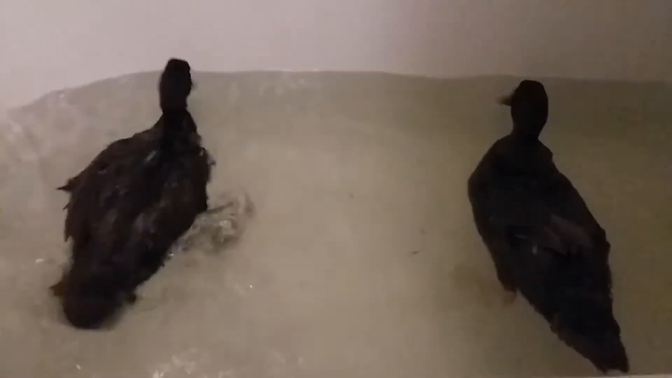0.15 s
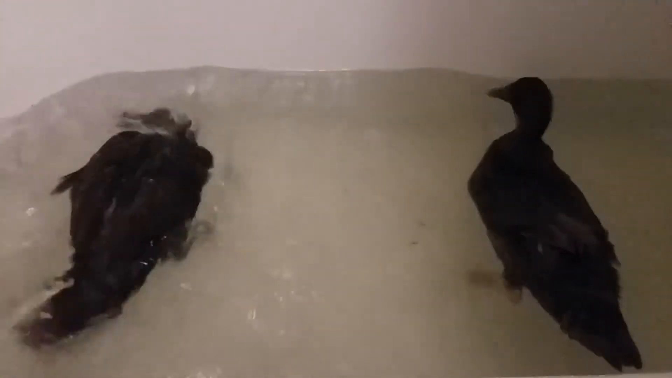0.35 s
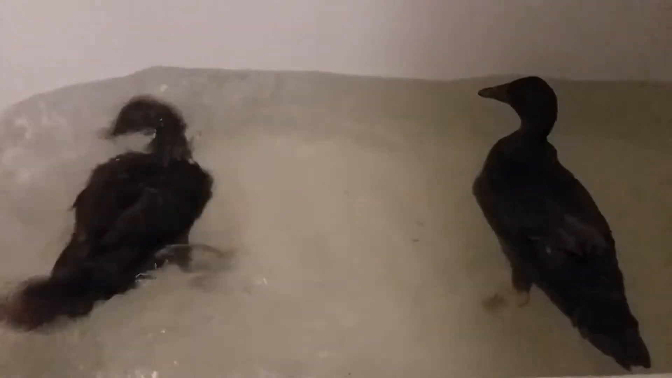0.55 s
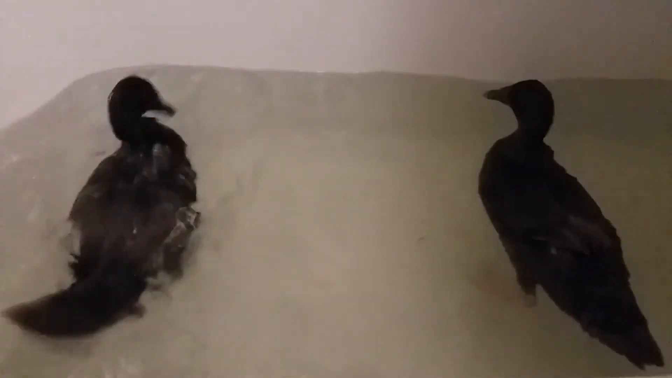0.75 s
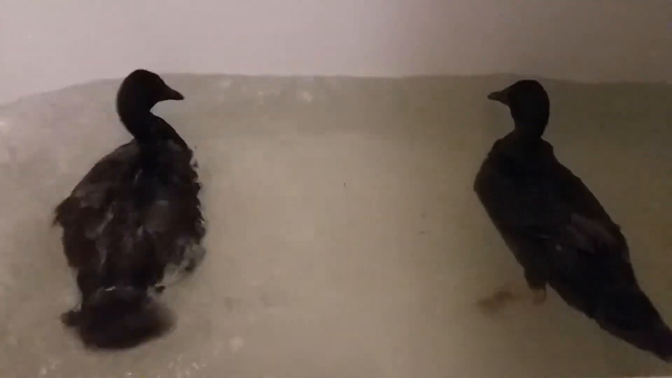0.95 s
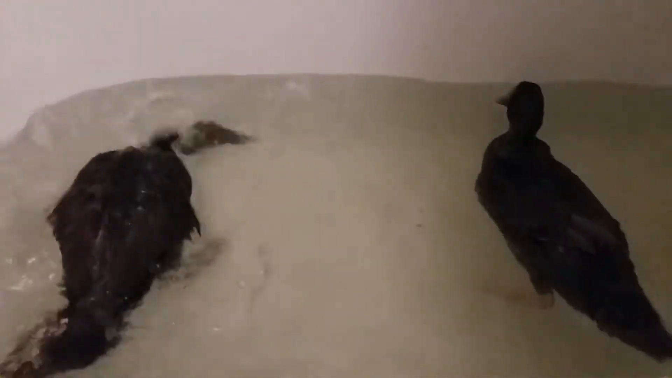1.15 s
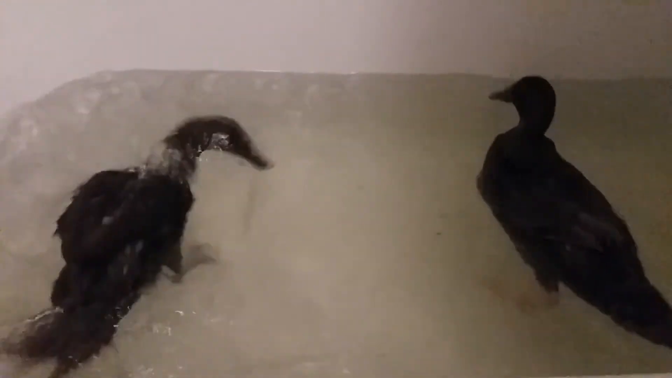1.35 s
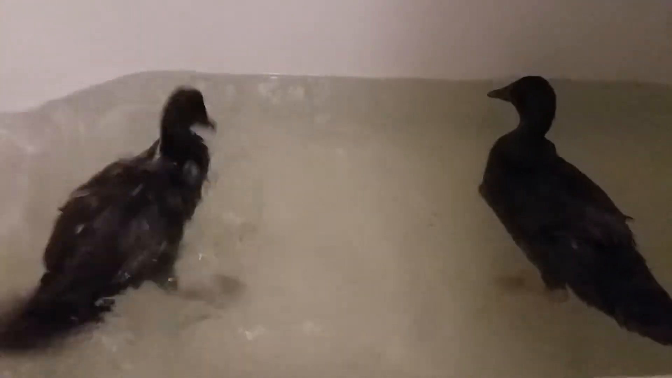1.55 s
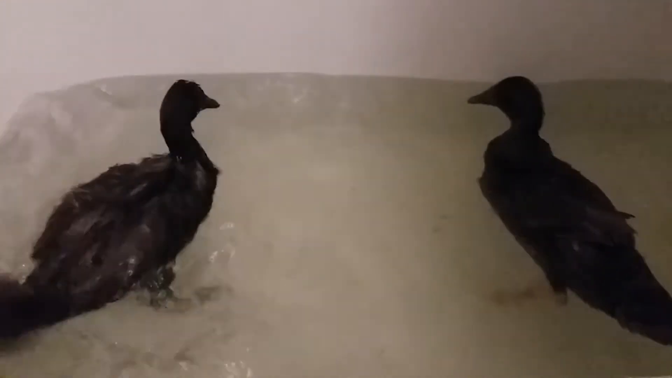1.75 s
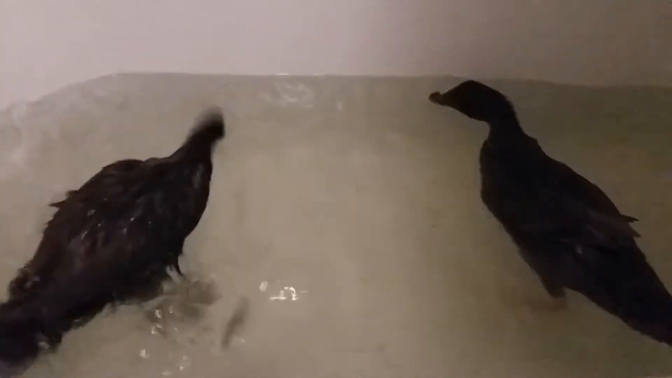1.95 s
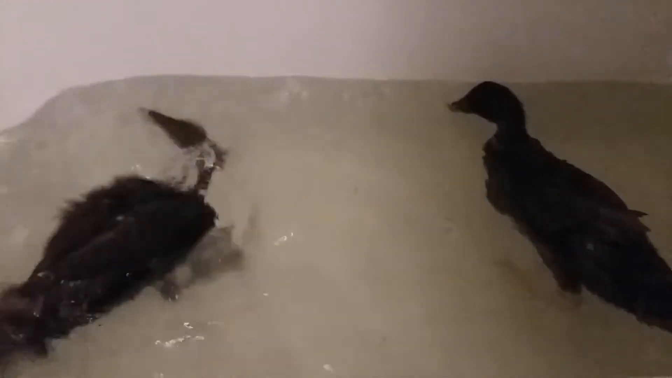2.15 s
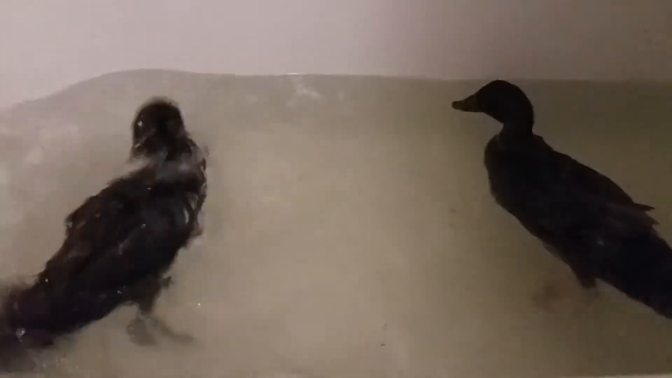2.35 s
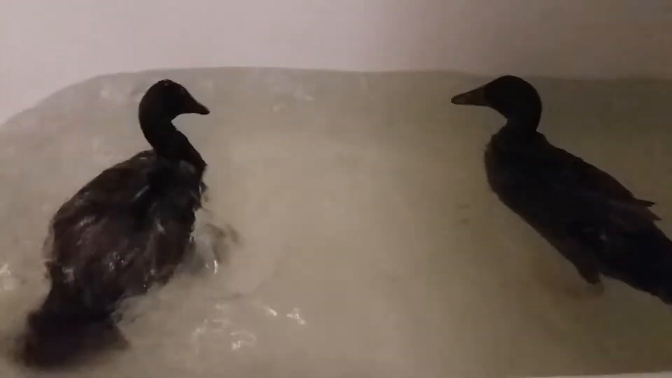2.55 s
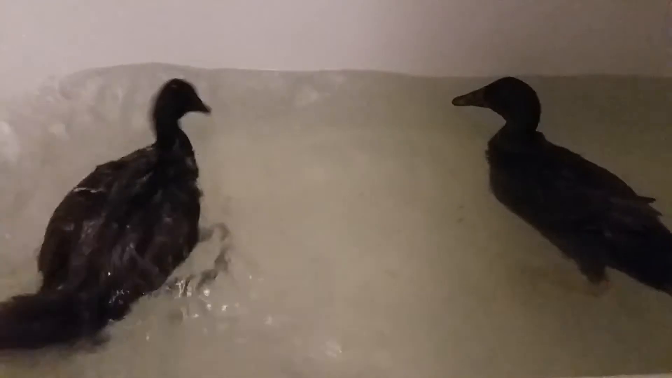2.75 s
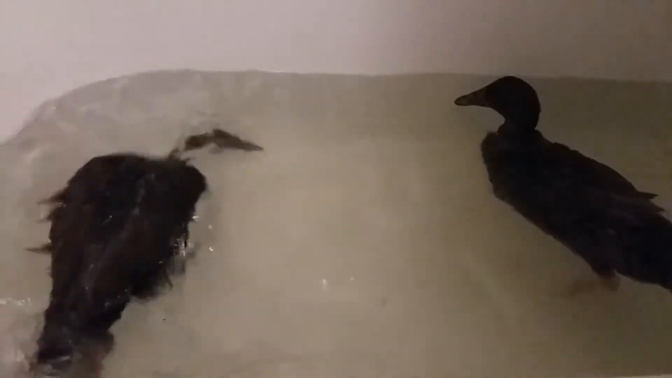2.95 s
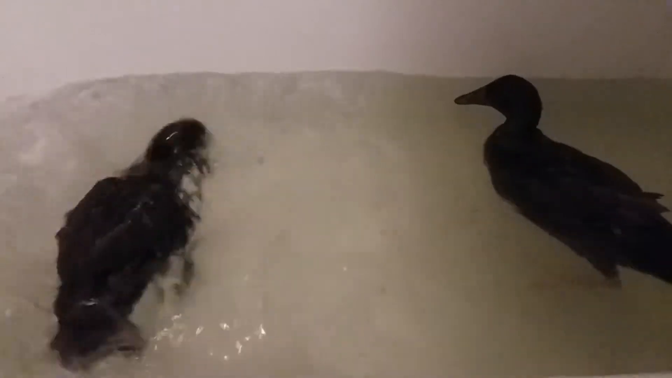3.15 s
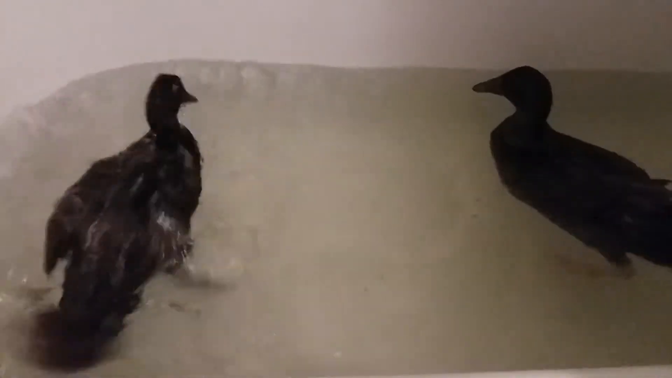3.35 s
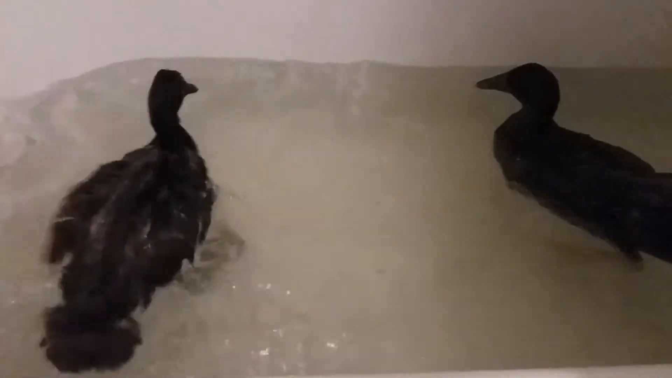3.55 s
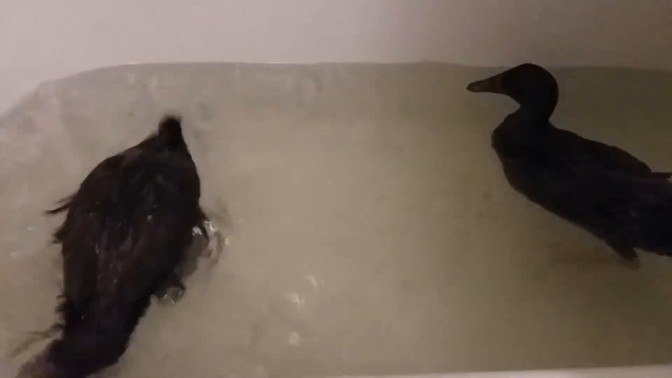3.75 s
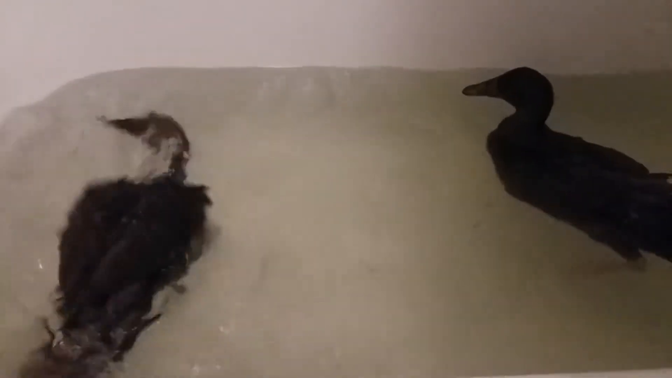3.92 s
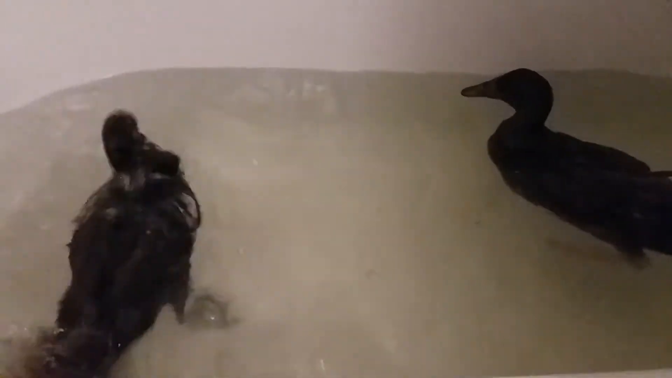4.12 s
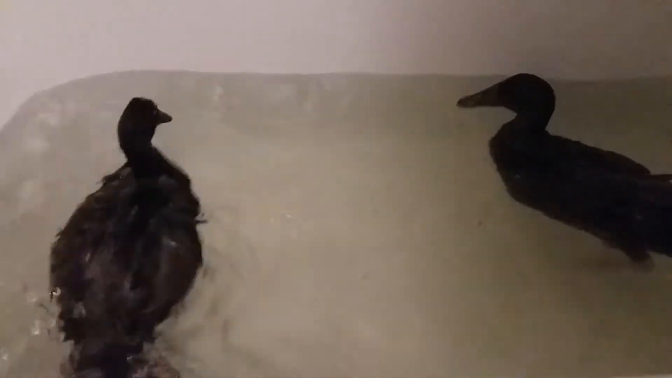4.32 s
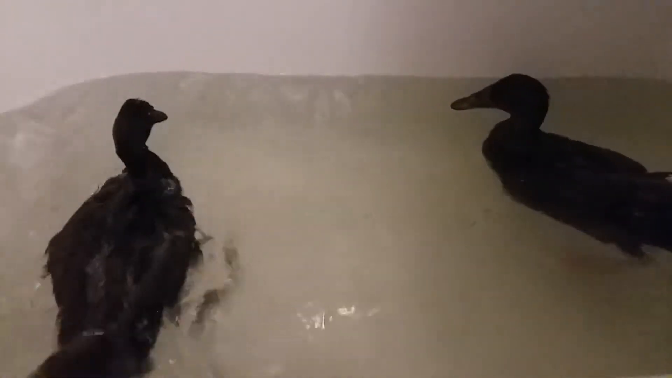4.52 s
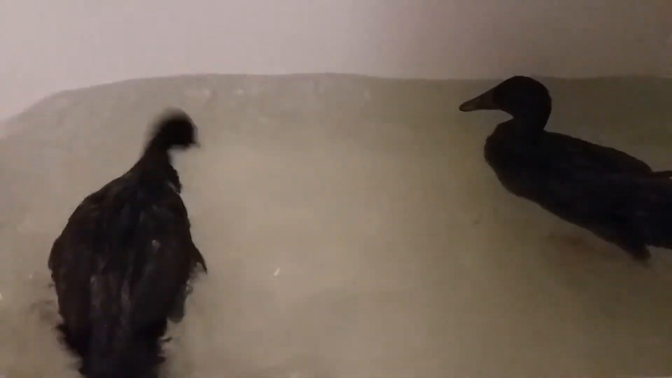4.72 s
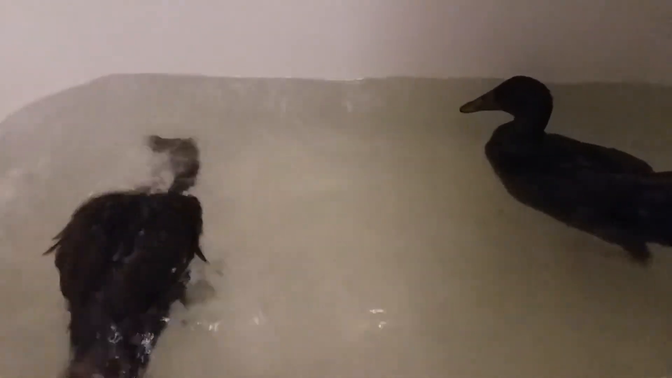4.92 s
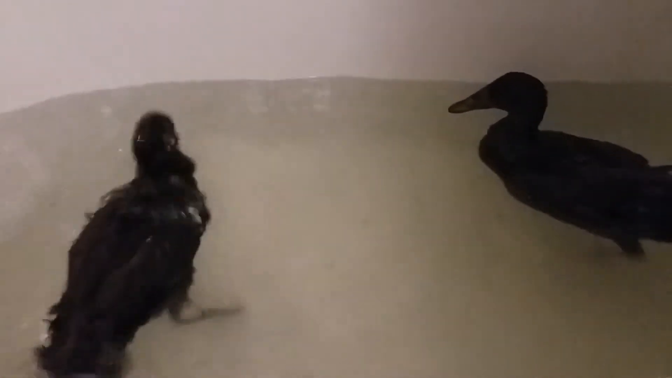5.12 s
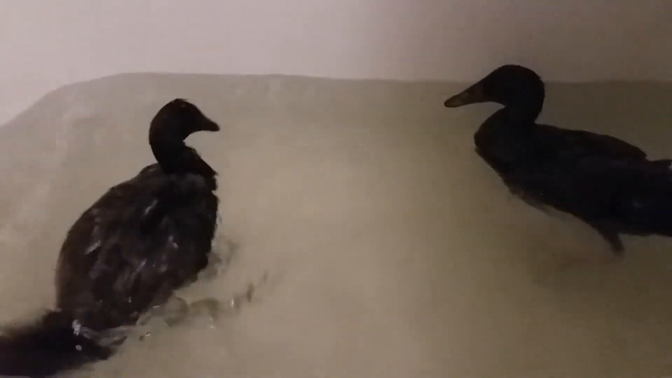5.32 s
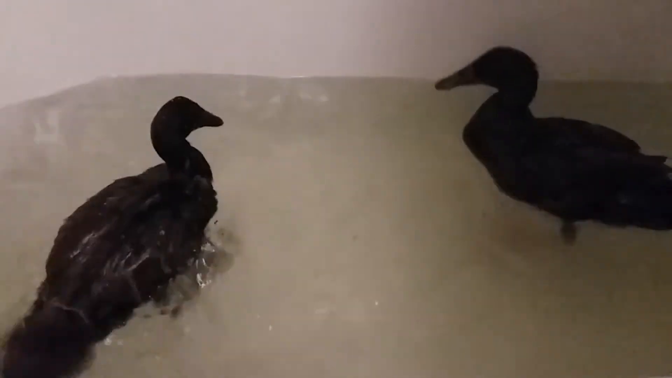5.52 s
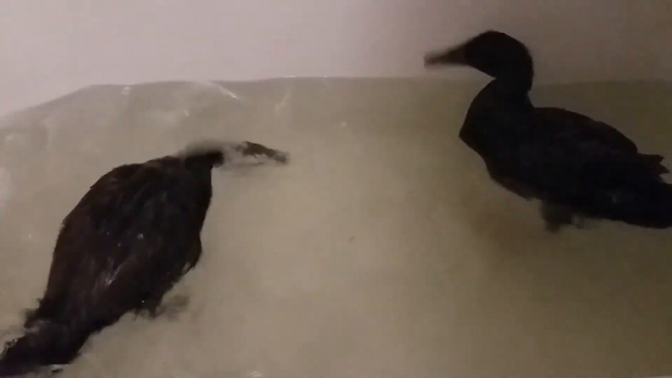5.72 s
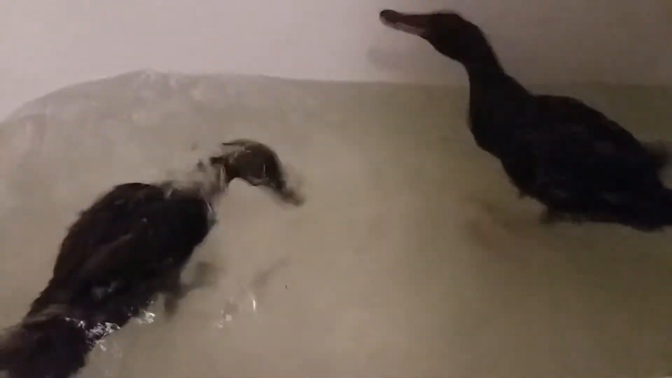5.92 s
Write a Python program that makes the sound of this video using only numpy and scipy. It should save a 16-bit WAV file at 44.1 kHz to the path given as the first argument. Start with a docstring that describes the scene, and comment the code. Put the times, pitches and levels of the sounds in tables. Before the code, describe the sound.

Two ducks in a half-filled bathtub indoors, heard closely over steady faint rumble and hiss. Light drips open, then from 0.3 to 0.75 seconds slaps, gurgling bubbles and sharp drops tumble together. A smaller splash comes near 0.95, a strong one at 1.27, and a hand thumps the right microphone at 1.44. Looser bubbling and drips continue until a bright, spattering burst around 2.1 to 2.5, full of rising chirps. It thins to drips, then slaps return at 3.0 and strongly at 3.2 to 3.3, with weak bumps on the right. Lower, gurgling splashes fill 3.75 to 4.4; another plop lands at 4.9 and bubbles trail off. Around 5.3 to 5.5 it is nearly calm, a crisp drop clicks at 5.53, small plops follow, and a fresh splash at 6.0 is cut off. Reflections are short and hard; left bright, right muffled.

```python
"""Over a faint rumble and hiss, a drop smacks, then chirps, slaps and spray: two ducks in a half-filled bathtub.
Bubbles are rising sines, drops and slaps are filtered noise clicks, and splashes swell and fade as
swarms of random bubbles and patters of droplet clicks. The hard tub smears the water into a short dense ring.
The left microphone is bright, the right one muffled; a hand knocks the right one at times."""
import sys
import numpy as np
from scipy import signal
from scipy.fft import rfft, irfft
from scipy.io import wavfile

SR = 44100
rng = np.random.default_rng(int(sys.argv[2]) if len(sys.argv) > 2 else 0)


def store_wav(level_fs):
    """Save 16-bit WAV to argv[1]."""
    pcm = np.round(np.clip(np.atleast_2d(level_fs), -1, 1) * 32767)
    wavfile.write(sys.argv[1], SR, pcm.T.astype(np.int16))


N = 268125  # length in samples
SPOTS = 4  # places in the tub, each with echoes of its own


def from_db(db):
    """dB to gain."""
    return 10 ** (np.asarray(db) / 20)


def rms_one(x):
    """Scale to rms 1."""
    return x / np.sqrt(np.mean(x ** 2) + 1e-20)


def at_hz(points, hz):
    """Read a table on a log-frequency axis."""
    table_hz, values = np.array(points).T
    return np.interp(np.log(hz), np.log(table_hz), values)


def coloured(x, spectrum):
    """Weight a signal by a spectrum in dB."""
    length = x.shape[-1]
    hz = np.fft.rfftfreq(length, 1 / SR) + 1  # keeps the logarithm finite
    return irfft(rfft(x) * from_db(at_hz(spectrum, hz)), length)


def filtered(x, order, edges, kind):
    """Butterworth filter; edges in Hz."""
    return signal.sosfilt(signal.butter(order, edges, kind, fs=SR, output="sos"), x)


def add(track, s, sound):
    """Mix a sound in at a time in seconds."""
    i = int(round(s * SR))
    track[i:i + len(sound)] += sound[:N - i]


# Spectrum shape of the house rumble and hiss. Each row: frequency in Hz, relative density in dB per Hz.
HUSH_SPECTRUM = [(12, -9), (20, -16.5), (104, 10), (268, 3.5), (385, -21.5), (730, -11), (1210, -19),
                 (1900, -17), (2790, -14), (4600, -11), (7820, -11), (8740, -12), (15700, -12)]


def hush(level_db):
    """House rumble and hiss: steady coloured noise, mostly shared by both sides, partly each side's own."""
    shared, *own = coloured(rng.standard_normal((3, N)), HUSH_SPECTRUM)
    return from_db(level_db) * rms_one(2.16 * shared + np.array(own))


# The hand at the right microphone. Each row: start in seconds, push level in dB, sign,
# push width in seconds, case ring in Hz.
HAND_KNOCKS = [(1.436, -11, -1, .00021, 210), (3.310, -25, 1, .0003, 150), (3.346, -28, 1, .0004, 200),
               (3.548, -23, -1, .0003, 260), (3.654, -41, -1, .0015, 120), (3.868, -37, -1, .0015, 90),
               (3.908, -42, 1, .002, 90), (3.930, -43, 1, .002, 90)]


def knocks(ring_db, cycles):
    """A short pressure push, then the case swings back and rings, losing 60 dB in the given cycles."""
    out, t = np.zeros(N), np.arange(-400, 4000) / SR
    for s, peak_db, sign, width, hz in HAND_KNOCKS:
        push = np.exp(-.5 * (t / width) ** 2)
        after = np.maximum(t - width, 0)
        swing = -from_db(ring_db - 60 * after * hz / cycles) * np.sin(2 * np.pi * hz * after)
        add(out, s + t[0], sign * from_db(peak_db) * (push + swing))
    return filtered(out, 1, 35, "high")


# Tone of the droplet spray. Each row: frequency in Hz, weight in dB per Hz.
SPRAY_SPECTRUM = [(1470, -2), (2500, -1.5), (2870, -4), (3530, -3.5), (4770, -9), (8490, -2.5),
                  (10400, -2.5), (13300, 6.5), (15700, 16.5)]


def spray(level_db, per_s, spread_db):
    """Fine droplets: clicks of uneven strength, each place with a pitch range of its own."""
    strength = from_db(spread_db * np.minimum(rng.exponential(1, (SPOTS, N)), 4))
    lands = rng.random((SPOTS, N)) < per_s / SR
    clicks = strength * rng.choice([-1, 1], (SPOTS, N)) * lands
    for k, hz in enumerate(np.geomspace(3500, 11000, SPOTS)):
        clicks[k] = filtered(clicks[k], 1, [hz * 0.6, hz * 0.84], "band") / np.sqrt(hz)
    return from_db(level_db) * rms_one(coloured(clicks, SPRAY_SPECTRUM))


def bubble(hz, octaves, life, fade_db=5.0):
    """A sine whose pitch climbs as the bubble nears the surface; it fades, then bursts."""
    t = np.arange(int(np.clip(life, .002, .12) * SR)) / SR
    pitch = np.minimum(hz * 2 ** (octaves * t / life), 12000)
    phase = np.cumsum(2 * np.pi * pitch / SR)
    burst = np.minimum(1, (life - t) / (0.15 * life))  # quick drop over the last of its life
    return np.sin(phase) * from_db(-fade_db * t / life) * burst


def swarm(level_db, per_s, low_hz, high_hz, cycles, spread_db):
    """Bubbles born at random, of random size, strength and glide; smaller ones ring higher and shorter."""
    out, draws = np.zeros((SPOTS, N)), rng.random((6000, 4))
    born = np.cumsum(-np.log(1 - draws[:, 0]) / per_s)  # random gaps around the mean rate
    for k, (s, (_, size, force, rise)) in enumerate(zip(born[born < N / SR], draws)):
        hz = low_hz * (high_hz / low_hz) ** size
        add(out[k % SPOTS], s, from_db(spread_db * force) * bubble(hz, 0.913 * rise, cycles / hz))
    return from_db(level_db) * rms_one(out) / SPOTS


# Splashes that churn the water. Each row: peak in seconds, swell in seconds, spray fade in seconds,
# then the drive of gurgle, small bubbles and spray in dB.
WATER_SPLASHES = [(0.08, 0.3, 0.14, -73.5, -86, -70.5), (0.28, 0.025, 0.11, -75, -61, -62),
                  (0.33, 0.011, .2, -50, -44, -66), (0.446, .01, 0.22, -38.5, -44.5, -57),
                  (0.485, 0.041, 0.12, -47, -38, -50), (0.68, 0.084, .1, -45, -36.5, -50),
                  (0.745, 0.045, 0.2, -54, -46, -52), (0.98, 0.12, 0.082, -73, -45.5, -59.5),
                  (1.151, 0.18, 0.33, -62, -77, -58.5), (1.27, 0.031, 0.093, -43.5, -37, -43.5),
                  (1.49, .15, 0.13, -41.5, -56, -55), (1.59, 0.45, 0.13, -65, -42.5, -49.5),
                  (1.75, 0.51, 0.27, -70, -67, -60), (1.918, 0.031, 0.16, -60, -45.5, -64),
                  (2.08, 0.023, 0.17, -74, -55, -57), (2.168, 0.17, 0.049, -47.5, -39.5, -44),
                  (2.34, 0.23, 0.17, -53, -40, -46.5), (2.37, 0.018, 0.24, -56, -38, -48),
                  (2.581, 0.43, 0.14, -62, -58, -53.5), (2.71, 0.029, 0.18, -64.5, -71, -59),
                  (2.88, 0.14, 0.53, -69, -78, -64.5), (3.012, 0.059, 0.14, -47, -40, -46),
                  (3.129, 0.11, 0.15, -46.5, -44.5, -54), (3.224, 0.035, 0.23, -47, -35, -44.5),
                  (3.45, 0.49, 0.067, -60.5, -62, -65), (3.548, 0.023, 0.13, -51.5, -46.5, -58.5),
                  (3.609, .1, 0.029, -65, -68, -57), (3.75, 0.014, 0.25, -53, -54.5, -63),
                  (3.817, 0.0084, 0.13, -38.5, -36, -62), (3.91, .05, 0.16, -41.5, -40, -52.5),
                  (4.03, 0.07, .1, -51, -48.5, -64), (4.11, 0.07, 0.16, -44, -38, -67),
                  (4.169, 0.12, .15, -58.5, -39.5, -47.5), (4.298, 0.081, 0.18, -60, -41.5, -51.5),
                  (4.55, 0.36, 0.075, -68, -54, -59), (4.775, 0.021, 0.44, -58.5, -55, -61),
                  (4.916, 0.019, 0.39, -52, -36, -57.5), (5.04, 0.14, 0.4, -44.5, -43, -78),
                  (5.15, 0.17, 1, -55, -46, -53), (5.45, 0.11, .2, -80, -72, -78),
                  (5.539, 0.033, 0.016, -81, -65, -44.5), (5.62, .1, 0.17, -81, -66, -82),
                  (5.79, .05, 0.28, -80, -63, -55.5), (5.864, 0.065, 0.04, -56, -36, -44),
                  (5.95, 0.093, 0.16, -42.5, -41, -70), (6.014, 0.02, .2, -38, -47, -46)]


def churn(levels_db, lag_s=0, slower=1, span_db=20):
    """Level curve in dB: each splash climbs span_db in its swell, sinks span_db in its fade; powers add."""
    peak, swell, fade = np.array(WATER_SPLASHES)[:, :3, None].transpose(1, 0, 2)
    t = np.arange(0, N + 40, 40) / SR  # coarse steps, interpolated below
    since = t - peak - lag_s
    below = np.where(since < 0, -since / swell, since / (fade * slower))
    power = from_db(2 * (levels_db[:, None] - span_db * below)).sum(axis=0)
    return np.interp(np.arange(N) / SR, t, 10 * np.log10(power + 1e-12))


def splashes():
    """Churned water: low gurgle, small bubbles, droplet spray and a fizz of tiny bubbles that follows the spray."""
    gurgle, small, drops = np.transpose(WATER_SPLASHES)[3:]
    gurgle_db = churn(gurgle, lag_s=0.0044, slower=0.69)  # comes late, fades sooner than the spray
    small_db = churn(small, slower=0.78)
    spray_db = churn(drops)
    water = swarm(gurgle_db, per_s=260, low_hz=230, high_hz=850, cycles=5.12, spread_db=14.0)
    water += swarm(small_db, per_s=350, low_hz=753, high_hz=3625, cycles=13.25, spread_db=22.0)
    water += spray(spray_db, per_s=500, spread_db=5.0)
    fizz_db = spray_db + 3.5
    water += swarm(fizz_db, per_s=250, low_hz=3040, high_hz=10100, cycles=15.1, spread_db=6.0)
    return water


def bursts(events, t60, below, above):
    """Each impact is a click with a short wake of noise, band-passed around its own pitch."""
    out, t = np.zeros((SPOTS, N)), np.arange(600) / SR
    noises = rng.standard_normal((len(events), 600))
    for k, ((s, peak_db, hz), noise) in enumerate(zip(events, noises)):
        edges = [hz * below, min(hz * above, 19000)]
        click = noise * from_db(-60 * t / t60) + 3.1 * (t == 0)
        burst = filtered(click, 1, edges, "band")
        add(out[k % SPOTS], s, from_db(peak_db) * burst / np.abs(burst).max())
    return out


# Feet and wings slapping the water. Each row: start in seconds, dry peak in dB, centre in Hz.
WATER_SLAPS = [(0.276, -35, 1390), (0.412, -31.5, 1670), (0.441, -35, 1650), (0.443, -27, 330),
               (0.673, -24, 1520), (0.902, -33, 2520), (0.936, -53, 1110), (1.199, -46, 2580),
               (1.265, -22.5, 1874), (1.62, -28.5, 1590), (1.867, -53, 3150), (2.064, -45, 1810),
               (2.097, -28, 1980), (2.131, -29, 2550), (2.281, -28, 1660), (2.991, -39, 2920),
               (3.004, -28, 1010), (3.217, -24.5, 1710), (3.302, -25.5, 1370), (3.747, -42.5, 2630),
               (3.814, -29.5, 835), (3.897, -29, 1030), (4.109, -35, 840), (4.358, -30.5, 990),
               (4.487, -35, 2350), (4.772, -42, 1280), (4.867, -35, 2710), (4.911, -29, 3440),
               (5.508, -69, 2113), (5.582, -34, 1450), (5.605, -52, 1430), (5.777, -39, 1890),
               (5.866, -41, 1010), (6.016, -25, 3580)]


def slaps():
    """Broad impacts push a patch of water: wide-band bursts with a longer wake than the drops."""
    return bursts(WATER_SLAPS, t60=.008, below=.4, above=1.9)


# Drops smacking the surface or the wall. Each row: start in seconds, dry peak in dB, centre in Hz.
DROP_SMACKS = [(.0657, -36.5, 7900), (.1585, -27.5, 11400), (.4818, -15.5, 8240), (.6814, -22, 10800),
               (.7412, -23, 5700), (.9218, -30.5, 6940), (.9787, -32, 5400), (1.1458, -31, 11300),
               (1.2027, -31, 6760), (1.2685, -35, 5300), (1.3663, -28, 4970), (1.4197, -36, 8710),
               (1.451, -28, 7000), (1.5384, -36, 8000), (1.5823, -22.5, 5460), (1.6945, -27, 8600),
               (1.7888, -33, 4950), (1.8687, -25.5, 7400), (1.9793, -43, 5900), (2.0018, -29, 9050),
               (2.0752, -40, 8430), (2.0976, -19, 8100), (2.1326, -23, 9020), (2.162, -14.5, 6800),
               (2.2887, -45, 5570), (2.3087, -33, 12900), (2.3516, -18.5, 7400), (2.4773, -25.5, 13700),
               (2.586, -28, 5270), (2.7092, -36, 7940), (2.798, -32, 11560), (3.0041, -36, 4930),
               (3.0106, -24.5, 7300), (3.1173, -36, 6140), (3.2171, -40, 5550), (3.4575, -35, 8850),
               (3.4945, -31.5, 8360), (3.5423, -27.5, 12200), (3.5828, -33.5, 5970), (3.6153, -36, 7520),
               (3.7459, -36.5, 6000), (3.8711, -32, 12500), (4.0272, -28.5, 5600), (4.2971, -28, 6200),
               (4.3205, -27, 5500), (4.413, -33, 9200), (4.8249, -38, 8980), (4.9272, -23, 5430),
               (5.0584, -36.5, 5500), (5.1003, -33, 8100), (5.464, -30, 5800), (5.5328, -15, 12600),
               (5.6007, -32, 6650), (5.7269, -29.5, 11700), (5.8541, -22.5, 6360), (6.0062, -32, 5330)]


def smacks():
    """Small hard impacts: narrow bursts that die within milliseconds."""
    return bursts(DROP_SMACKS, t60=.004, below=.82, above=1.25)


# Bubbles that stand out. Each row: start in seconds, starting pitch in Hz, dry level in dB,
# pitch rise in octaves, life in seconds.
SINGLE_BUBBLES = [(.159, 4350, -55, .25, .013), (.273, 1490, -43, 0.5, 0.013),
                  (.274, 1276, -43.5, 0.16, 0.037), (.274, 2090, -34, .73, 0.011),
                  (.292, 2670, -32.5, 0.11, 0.0039), (.331, 940, -32.5, 0.34, 0.0036),
                  (.413, 1550, -32.5, 0.25, 0.009), (.441, 218.5, -35.5, 0.32, 0.028),
                  (.441, 715, -35, 0.41, 0.0036), (.467, 1580, -38, 1.5, 0.023),
                  (.483, 3680, -38, .12, 0.0047), (.488, 900, -44, 1.16, 0.018),
                  (.593, 1590, -39, 0.35, 0.0043), (.604, 680, -41.5, .16, 0.006),
                  (.624, 3441, -46.5, .25, .008), (.666, 1590, -37.5, 0.74, 0.02),
                  (.671, 649, -41, 0.42, 0.031), (.686, 1480, -29.5, 0.26, 0.0058),
                  (.899, 2350, -37, 0.17, 0.011), (.934, 981, -33, 1.31, 0.045),
                  (.965, 2940, -42.5, 0.72, 0.015), (.973, 1460, -48, .9, 0.013),
                  (1.044, 2430, -45.5, 0.18, 0.01), (1.108, 632, -49.5, .3, 0.0053),
                  (1.199, 2300, -30.5, 0.33, .008), (1.245, 1210, -40, .78, 0.033),
                  (1.26, 2810, -33, 0.75, 0.015), (1.264, 248, -36, 0.31, 0.0085),
                  (1.264, 798, -29.5, 1.6, 0.0063), (1.279, 1564, -32.5, 0.5, 0.01),
                  (1.307, 640, -30.5, 0.43, 0.0039), (1.33, 255, -45, 0.087, 0.047),
                  (1.386, 2930, -39, 0.71, 0.01), (1.464, 1014, -42, 0.46, 0.011),
                  (1.483, 667, -39.5, 1.29, 0.055), (1.49, 2160, -37.5, 0.26, 0.0052),
                  (1.516, 1100, -40, 0.18, 0.015), (1.559, 1090, -32, 0.17, 0.0068),
                  (1.572, 1730, -40, 0.41, 0.026), (1.6, 522, -48, 0.41, 0.024),
                  (1.62, 1500, -34, 0.3, 0.017), (1.665, 1398, -45, 0.24, 0.038),
                  (1.669, 2410, -46, .21, 0.02), (1.777, 3220, -45, 0.4, 0.013),
                  (1.827, 2420, -49.5, 0.29, 0.035), (1.869, 2720, -37.5, 0.57, 0.008),
                  (1.92, 1650, -35, .49, 0.003), (2.062, 2320, -48, .25, 0.0083),
                  (2.072, 1292, -45, .25, 0.0063), (2.098, 2910, -38, 0.33, 0.0064),
                  (2.129, 2330, -32.5, 0.37, 0.024), (2.13, 231, -47, 0.53, 0.071),
                  (2.13, 1350, -38, 0.25, 0.03), (2.145, 376, -44.5, 0.44, 0.016),
                  (2.153, 5840, -33.5, 0.29, 0.02), (2.242, 1050, -42, 0.59, 0.011),
                  (2.28, 1400, -41.5, 0.88, 0.04), (2.28, 1590, -30.5, .1, 0.0048),
                  (2.309, 1604, -32.5, 1.4, 0.021), (2.326, 2260, -33, 0.83, 0.031),
                  (2.362, 617, -39, 0.35, 0.044), (2.366, 1040, -42, 1.2, 0.022),
                  (2.378, 1985, -35, 0.094, 0.017), (2.386, 500, -45, 0.058, .012),
                  (2.402, 476.6, -36.5, 0.72, 0.053), (2.429, 2200, -39.5, 0.44, 0.022),
                  (2.425, 645, -45, 0.14, 0.028), (2.445, 508, -38.5, 0.95, 0.0263),
                  (2.455, 2135, -35.5, 0.45, 0.014), (2.47, 610, -41, .2, 0.023),
                  (2.484, 1626, -33, 0.16, 0.018), (2.54, 994, -37, 0.41, 0.028),
                  (2.585, 4600, -45, 0.35, 0.016), (2.618, 1524, -40, 0.26, 0.017),
                  (2.645, 1590, -47, .05, 0.013), (2.652, 2960, -45, .25, .012),
                  (2.712, 5200, -51.5, 0.054, 0.021), (2.745, 2430, -52, 0.085, 0.019),
                  (2.854, 2620, -56, 0.26, 0.014), (2.984, 2404, -44, 1.3, 0.026),
                  (3.003, 1000, -41, 0.25, 0.0075), (3.003, 4220, -26.5, .12, 0.0032),
                  (3.018, 2850, -30.5, 0.62, 0.0067), (3.164, 660, -44, 0.34, 0.007),
                  (3.166, 2060, -41.5, 0.53, 0.014), (3.212, 660, -39.5, 1.73, .058),
                  (3.216, 2230, -31, 0.86, 0.017), (3.216, 3340, -36, 1.2, .0082),
                  (3.217, 1560, -24.5, .74, 0.0086), (3.237, 1555, -34.5, 0.24, 0.034),
                  (3.239, 1210, -41, .25, .074), (3.299, 1820, -41.5, 0.061, 0.025),
                  (3.301, 1300, -22, 0.12, 0.0084), (3.323, 1310, -30.5, 0.84, 0.0045),
                  (3.431, 2390, -39.5, 0.26, 0.0093), (3.467, 4120, -47, 0.12, 0.0059),
                  (3.555, 1953, -45.5, 0.24, 0.018), (3.593, 2990, -50, 0.21, 0.0116),
                  (3.744, 2180, -41, 0.66, 0.01), (3.811, 724, -36.5, 0.23, 0.0034),
                  (3.812, 2450, -44, 0.43, 0.0083), (3.888, 1126, -41, 1.1, .03),
                  (3.89, 898, -39.5, 0.8, 0.043), (3.899, 3740, -39, .38, .0091),
                  (4.086, 1840, -43, 0.2, .0069), (4.105, 576, -32.5, 0.89, 0.017),
                  (4.107, 2560, -47, 0.29, 0.0092), (4.136, 3470, -37, .3, .0084),
                  (4.139, 2060, -39, 0.34, 0.0056), (4.144, 734, -38, 0.48, 0.023),
                  (4.15, 1650, -43, 1.2, 0.05), (4.185, 2536, -35.5, .28, 0.012),
                  (4.213, 945, -35, 0.14, .01), (4.256, 605, -44, 1.2, 0.054),
                  (4.257, 2620, -31, .089, 0.0038), (4.32, 3090, -39, .21, 0.016),
                  (4.356, 801, -29.5, .8, 0.019), (4.415, 3060, -32, 0.38, 0.0069),
                  (4.488, 2290, -44, 0.31, 0.027), (4.523, 1800, -40.5, .31, 0.006),
                  (4.534, 2770, -42.5, 0.26, 0.029), (4.536, 1364, -44.5, .34, 0.025),
                  (4.773, 1200, -50, 0.1, 0.0025), (4.868, 2880, -42, 0.34, 0.0085),
                  (4.908, 3040, -31.5, 0.43, 0.01), (4.91, 1475, -41, 1.5, 0.027),
                  (4.918, 223, -48.5, .21, .015), (4.948, 722, -42, 0.74, 0.029),
                  (4.98, 418, -49.5, 0.2, 0.021), (4.98, 791, -42, 0.35, 0.051),
                  (5.032, 251, -42.5, 0.22, 0.011), (5.041, 1160, -31.5, 0.67, 0.0063),
                  (5.105, 2000, -38.5, 0.31, 0.014), (5.111, 2940, -42, .3, 0.011),
                  (5.121, 313, -42.5, .76, 0.059), (5.155, 390, -48, 0.48, 0.025),
                  (5.155, 3460, -29, 0.24, 0.0026), (5.184, 570, -32.5, .54, 0.0044),
                  (5.213, 2280, -40, 0.22, 0.015), (5.215, 1240, -40, 0.54, 0.015),
                  (5.297, 1204, -46.5, 0.77, 0.036), (5.316, 588, -40, 0.29, 0.0078),
                  (5.397, 2750, -43.5, 0.21, 0.0093), (5.325, 1767, -51, 0.12, 0.018),
                  (5.403, 1120, -49, .05, 0.031), (5.505, 1920, -44, 0.24, .011),
                  (5.557, 1180, -47.5, 0.053, 0.019), (5.581, 1430, -42, 0.12, 0.016),
                  (5.604, 1095, -32.5, 0.89, 0.023), (5.604, 2074, -39, 0.54, 0.0099),
                  (5.774, 1846, -36, .29, 0.012), (5.817, 1040, -45, 0.53, 0.017),
                  (5.867, 230, -49, 0.42, 0.019), (5.867, 850, -34, 0.6, 0.0042),
                  (5.943, 1010, -37.5, .17, 0.0047), (6.009, 1670, -35, 1.05, .01),
                  (6.009, 1700, -41.5, 1.02, 0.045), (6.016, 2990, -25, 0.7, 0.0049),
                  (6.036, 540, -33.5, 0.77, 0.033), (6.036, 1220, -38.5, 0.93, 0.038)]


def big_bubbles():
    """The single bubbles chirp as they rise, dealt in turn to the places."""
    out = np.zeros((SPOTS, N))
    for k, (s, hz, level_db, octaves, life) in enumerate(SINGLE_BUBBLES):
        add(out[k % SPOTS], s, from_db(level_db) * bubble(hz, octaves, life))
    return out


# Echo decay. Each row: frequency in Hz, t60 in seconds.
ECHO_T60 = [(200, 0.086), (530, 0.18), (1400, 0.24), (3700, 0.2), (9700, 0.16)]
# Wet walls and air take the treble. Each row: frequency in Hz, echo level in dB.
WALL_COLOUR = [(200, -1), (1500, -2), (4000, -5), (9000, -8), (15000, -9)]
# Left-right likeness of the echoes. Each row: frequency in Hz, likeness from 0 to 1.
ECHO_LIKENESS = [(60, 0.8), (270, 0.68), (700, 0.93), (1200, 0.073), (2500, 0.21), (5000, 0.1),
                 (15000, 0.054)]
# Low modes of the tub. Each row: pitch in Hz, level against the tail in dB, t60 in seconds (held to 0.4 at most).
LOW_MODES = [(268, -27, 0.77), (450.5, -30, 0.76), (534, -36, 0.81), (679, -26, 0.66), (850, -28.5, 1),
             (1270, -27, 0.1), (1698, -25.5, 0.19)]
# Later arrival at the right side. One column: delay in seconds, one row for each place.
RIGHT_DELAY = [.00043, .0004, .00022, .00046]


def tub(x, tail_db, first_echo_s, build_s, room_db, room_slower, near_db, near_t60):
    """Direct sound, strong first echoes, dense echoes dying band by band, and low modes; the right comes late."""
    t = np.arange(SR // 2) / SR
    edges, echoes = 40 * 2 ** np.arange(0, 9.1, .5), np.zeros((2, SPOTS, len(t)))  # half-octave bands
    near_walls = from_db(near_db - 60 * t / near_t60)  # strong first echoes off the enamel
    white = rng.standard_normal((2, 2, SPOTS, len(t)))
    for k, (low, high) in enumerate(zip(edges, edges[1:])):
        left, other = filtered(white[k % 2], 2, [low, high], "band")
        hz = np.sqrt(low * high)
        alike = np.clip(at_hz(ECHO_LIKENESS, hz), 0, 1)
        right = alike * left + np.sqrt(1 - alike ** 2) * other
        fall_db = -60 * t / at_hz(ECHO_T60, hz)
        room = from_db(room_db + fall_db / room_slower)
        decay = from_db(fall_db) + room + near_walls
        echoes += np.array([left, right]) * from_db(at_hz(WALL_COLOUR, hz)) * decay
    echoes *= from_db(tail_db) * np.clip((t - first_echo_s) / build_s, 0, 1)
    echoes[..., 0] += 1  # direct sound
    for k, lag in enumerate(RIGHT_DELAY):
        echoes[1, k] = np.pad(echoes[1, k], (round(lag * SR), 0))[:len(t)]
    for hz, level_db, t60 in LOW_MODES:  # these reach both sides together
        ring_db = tail_db + level_db - 60 * t / min(t60, 0.4)
        echoes += from_db(ring_db) * np.sin(2 * np.pi * hz * t)
    return signal.fftconvolve(x[None], echoes, axes=2)[..., :N].sum(axis=1)


def scene():
    """The quiet house, the hand, and the water ringing in the tub."""
    quiet_house = hush(level_db=-59)
    hand = knocks(ring_db=-2, cycles=4.5) * [[0], [1]]  # right side only
    water = splashes() + slaps() + smacks() + big_bubbles()
    water = filtered(water, 2, 170, "high")  # the water sounds carry no deep bass
    ringing = tub(water, tail_db=-26.0, first_echo_s=0.00018, build_s=0.0014,
                  room_db=-0.5, room_slower=0.99, near_db=6.5, near_t60=0.0088)
    return ringing + quiet_house + hand


# Tone of the muffled right microphone. Each row: frequency in Hz, gain against the left in dB.
RIGHT_TONE = [(30, 10.5), (270, -2.5), (500, 0), (2000, 0), (3300, -8), (5500, -16.5), (9000, -29),
              (12500, -16.5), (16000, -12)]


def record(dry):
    """The right port is muffled; a steep low-pass cuts the top on both sides."""
    both = np.array([dry[0], coloured(dry[1], RIGHT_TONE)])
    top_cut = signal.cheby2(14, 70, 16000, fs=SR, output="sos")  # order, dB down, stop edge in Hz
    return signal.sosfilt(top_cut, both)


dry = scene()
out = record(dry)
store_wav(out)
```